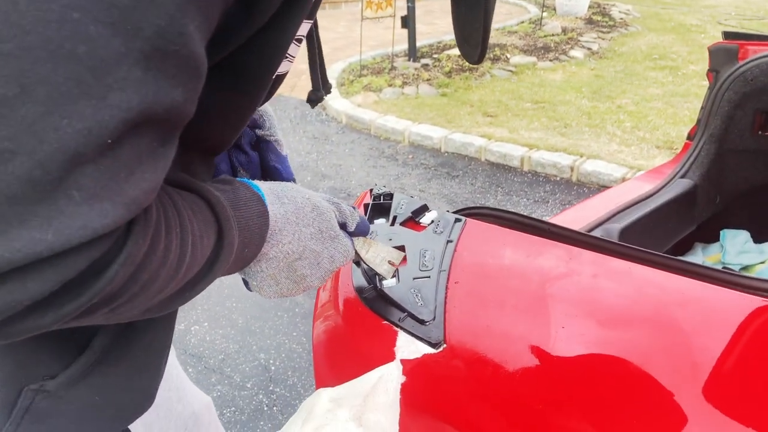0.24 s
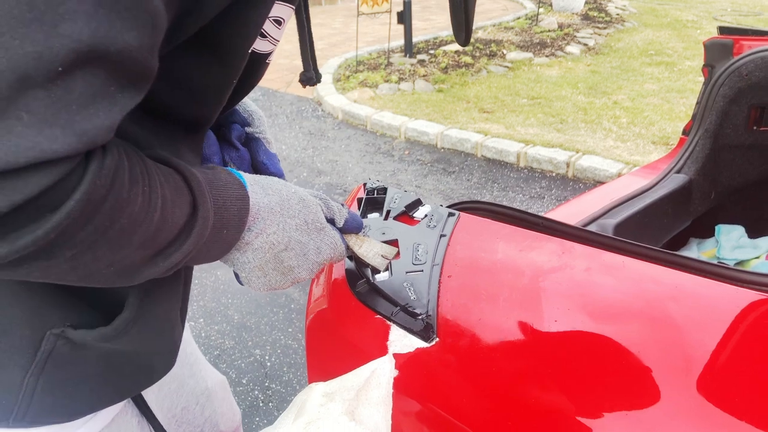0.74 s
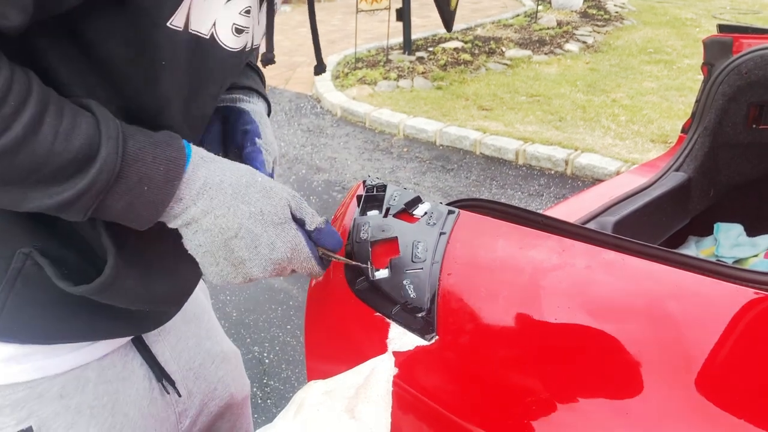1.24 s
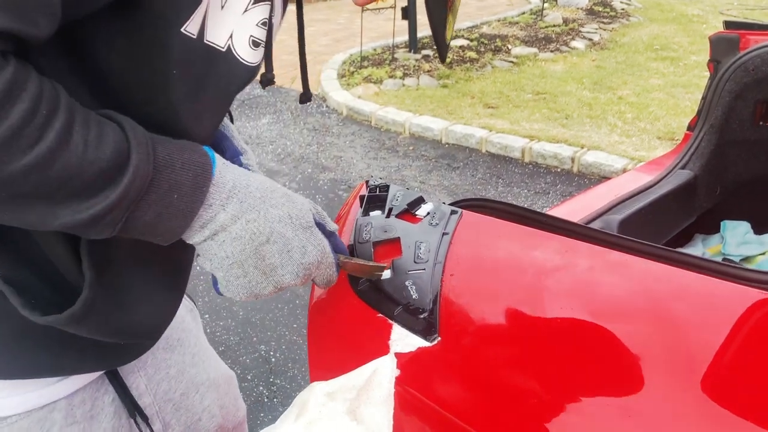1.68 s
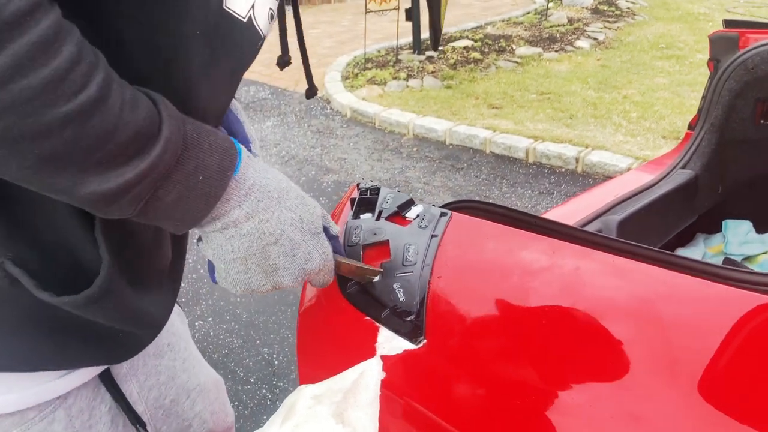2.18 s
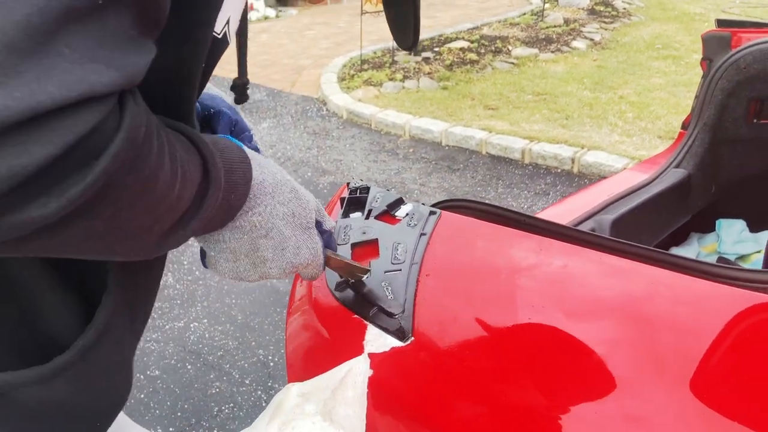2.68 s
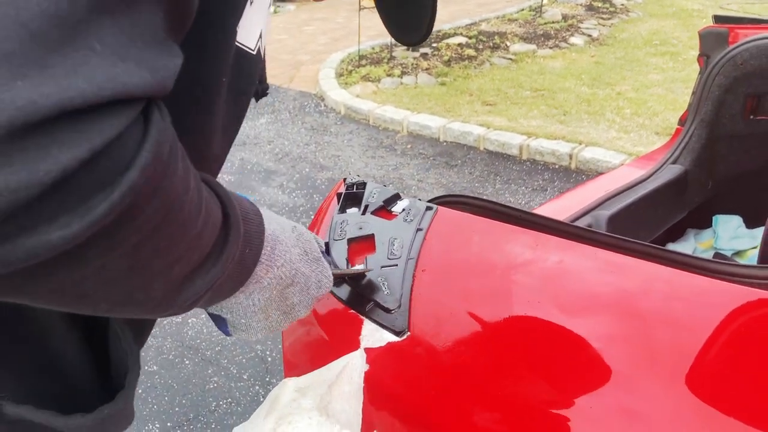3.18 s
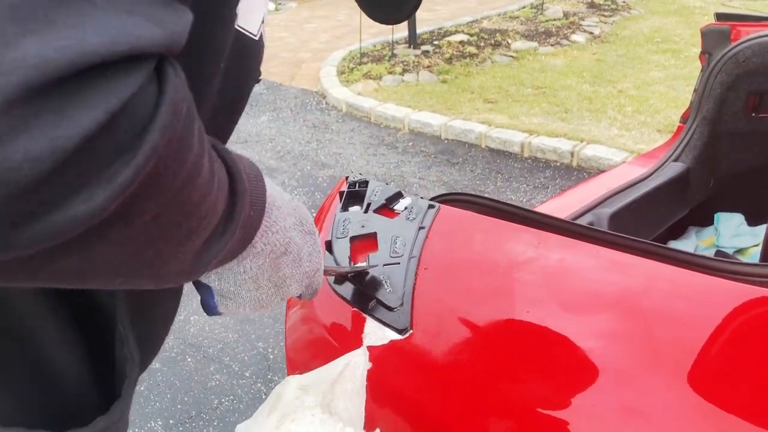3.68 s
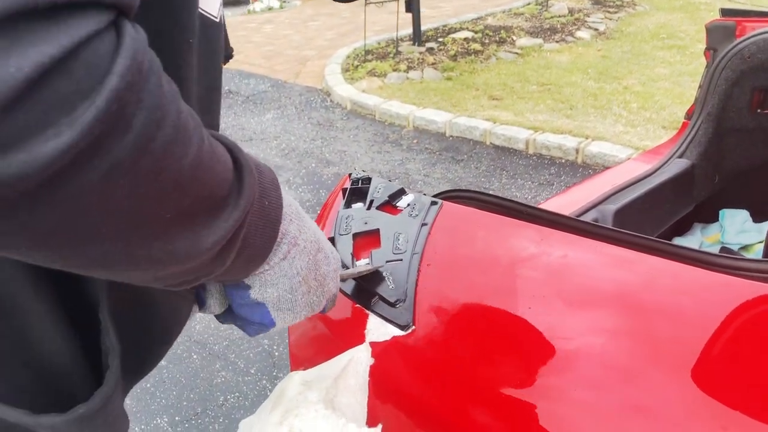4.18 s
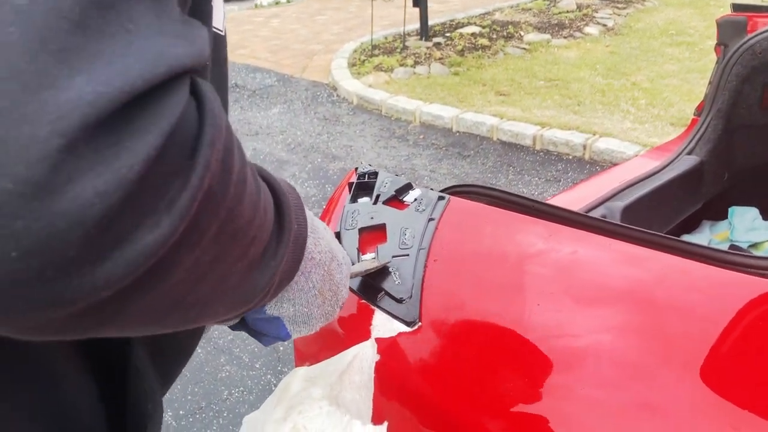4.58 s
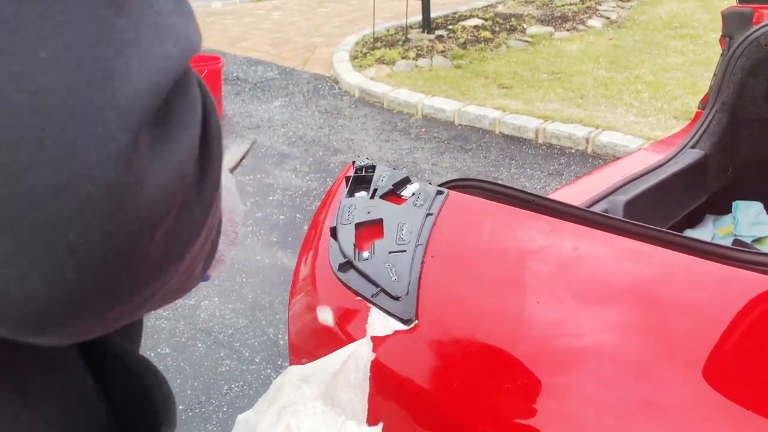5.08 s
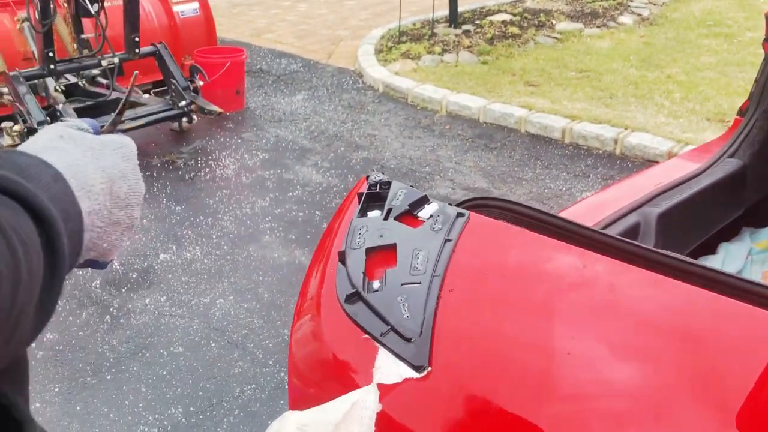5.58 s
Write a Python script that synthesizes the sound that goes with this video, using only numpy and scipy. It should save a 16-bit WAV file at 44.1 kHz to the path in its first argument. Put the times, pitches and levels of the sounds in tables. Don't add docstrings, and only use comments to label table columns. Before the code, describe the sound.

Plastic ticks, gritty rubs, hollow booms and a final sharp clip break outdoors, over small birdsong and distant road hum.

```python
import sys
import numpy as np
from scipy import signal
from scipy.fft import rfft, irfft, next_fast_len
from scipy.io import wavfile
from scipy.ndimage import uniform_filter1d, map_coordinates

SR = 44100
rng = np.random.default_rng(int(sys.argv[2]) if len(sys.argv) > 2 else 0)


def invert_db(x):
    u = np.asarray(x, float) / 20
    return 10 ** u


def pcm_store(signal):
    levels = np.round(np.clip(np.atleast_2d(signal), -1, 1) * 32767)
    wavfile.write(sys.argv[1], SR, levels.astype(np.int16).T)


N = 257676

# pitch_hz, level_db per Hz
ROAD_HUM = [(160, -34.5), (280, -4), (316, -2), (429, -2.5), (1020, -2), (1590, -11.5), (2850, -33.5),
            (4070, -33), (6570, -42.5), (15200, -49.5), (16500, -60)]
ROAD_RUMBLE = [(15, -60.5), (25, -21), (43, -12.5), (57, -7.5), (70, 0.5), (183, -3.5), (260, -9.5),
               (340, -39), (570, -120)]
HUM_DB, RUMBLE_DB = -55, -52.5
# peak_s, spread_s, level_db
PASSING_CAR = (4.6, .16, 2.5)
HUM_DUCK, RUMBLE_DUCK = (9.5, 4.5), (14.8, 17)  # depth_db, recovery_db_per_s
DUCK_FALL_S, DUCK_HOLD_S = 0.09, 0.17

# time_s, pitch_hz
HOOK = [(0, 4000), (.01, 4150), (.021, 5700), (.029, 5800), (.042, 5400), (.053, 5900), (.063, 4200)]
ARCH = [(0, 3800), (.012, 4700), (.022, 4900), (.034, 4400), (.05, 3500)]
RISE = [(0, 5800), (.005, 6800), (.012, 7300), (.028, 8000)]
SLUR = [(0, 3100), (.035, 3500), (.06, 4200), (.075, 4370), (.09, 4200), (.117, 3550)]
CLIMB = [(0, 3000), (.042, 3380), (.074, 4200)]
SCOOP = [(0, 3900), (.018, 4150), (.032, 5400)]
DIVE = [(0, 5300), (.012, 3650)]
CREST = [(0, 6100), (.012, 7300), (.022, 7700), (.04, 7100)]
FALL = [(0, 4400), (.025, 3510), (.05, 3150)]
FLAT = [(0, 4030), (.02, 4020), (.04, 3850)]
NOTES = {"hook": (HOOK, 55), "arch": (ARCH, 55), "rise": (RISE, 25), "slur": (SLUR, 12),
         "climb": (CLIMB, 15), "fall": (FALL, 40), "flat": (FLAT, 130),
         "scoop": (SCOOP, 30), "dive": (DIVE, 30), "crest": (CREST, 80)}
# note, delay_s, stretch, pitch factor, level_db
PHRASE = [("flat", -.014, .5, 1.02, -3), ("hook", 0, 1.01, 1.01, .1), ("flat", .073, .8, .97, -2),
          ("arch", .105, .9, 1.01, -3)]
# start_s, pitch factor, level_db
PHRASE_STARTS = [(.195, .99, -67), (.75, .99, -63), (1.72, .99, -65), (3.02, 1.01, -64), (3.665, 1.02, -59)]
CALLS_UP = {"rise": [(.972, .55, 1.01, -76), (1.168, 1.01, 1.01, -65), (2.086, .6, .98, -69),
            (3.752, .5, 1.01, -67), (3.178, .9, .76, -65), (3.751, .45, .74, -63), (5.004, .7, .76, -69),
            (5.112, .6, .61, -66)], "slur": [(1.035, 1.45, .92, -67), (1.05, 1.3, .97, -70),
            (2.994, 1.01, 1.01, -55), (5.73, 1.6, .82, -73), (3.962, .5, .74, -63)],
            "climb": [(3.058, 1.01, 1.01, -57), (2.69, .7, .93, -68), (3.215, .6, 1.02, -70),
            (3.83, .33, 1.06, -62)], "scoop": [(4.996, 1.05, 1.01, -65), (5.074, .78, .97, -65)],
            "crest": [(3.21, 1.01, .99, -71)]}
CALLS_DOWN = {"fall": [(3.435, 1.01, 1.01, -72), (5.38, 1.3, .85, -77), (3.152, 1.1, .99, -63)],
              "dive": [(5.058, .9, .97, -66), (5.132, .95, 1.01, -65), (3.788, 1.3, 1.05, -66)],
              "flat": [(.001, 2.2, .97, -71), (.39, 1.3, 1.05, -74), (3.92, .6, 1.08, -65),
              (4.7, 2.2, .93, -70), (.812, .9, 1.33, -65), (.9, 3.1, .99, -73), (3.71, 1.3, 1.4, -67),
              (3.69, 1.2, .76, -66), (2.23, 4.5, 1.2, -75), (2.44, 4.5, 1.22, -75),
              (1.208, 1.01, 3.42, -74), (2.13, .9, 3.5, -77), (3.28, 2.1, .95, -67),
              (3.262, 1.5, 1.07, -70), (3.805, .5, .93, -62), (3.65, .6, 1.01, -62), (2.735, 1.9, .91, -67),
              (5.04, .9, 1.43, -69), (3.2, .9, 1.33, -70), (3.255, 1.4, 1.83, -77)]}
# t60_s, level_db, delay_s
HOUSE_ECHO = (.32, -4.5, .008)
FLUTTER_DB, BIRDS_DB = 2.2, -4

# hardest_s, rise_s, fall_s, hiss level_db, body level_db over the hiss
STROKES = [(.497, .032, 0.017, -70.5, 8), (1.18, 0.19, .12, -74.5, 0.5), (1.352, 0.028, .045, -75.5, 10),
           (2.25, 0.06, 0.04, -77, 2.5), (2.32, .05, .04, -83, 2.5), (3.85, .05, .06, -82, 2.5),
           (2.381, 0.013, 0.047, -61, 1.5), (2.516, 0.12, 0.037, -68, 3), (2.621, 0.056, 0.076, -73.5, 4),
           (2.722, 0.067, 0.02, -72, 6.5), (2.913, 0.025, 0.11, -76, 4), (3.149, .055, 0.048, -74.5, -6),
           (3.61, 0.062, 0.062, -75.5, 7), (3.74, 0.073, 0.062, -73.5, 10.5),
           (3.94, 0.032, 0.061, -68.5, 5), (4.149, 0.012, 0.009, -61, -3),
           (4.284, 0.049, 0.063, -67.5, 3.5), (4.424, 0.036, 0.25, -72.5, 6.5),
           (4.594, 0.038, 0.093, -67, -4.5), (4.71, 0.15, .025, -68.5, 6.5),
           (5.038, 0.045, 0.086, -74.5, 4), (5.173, 0.002, 0.022, -74, 15),
           (5.213, 0.0091, 0.055, -67, 5.5), (5.258, 0.019, 0.047, -66.5, 3), (5.548, 0.05, 0.0095, -64, 2),
           (5.742, 0.013, 0.03, -56.5, -2.5)]
# pitch_hz, level_db per Hz
GRIT = [(2940, -35), (5000, -1), (8880, -4.5), (11700, -8.5), (15200, -4), (16100, -1.5), (16500, -40.5)]
PLASTIC = [(500, -39.5), (1000, 2.5), (2200, 2.5), (3200, 0), (5000, -5), (8000, -18.5), (12000, -54)]
EASE_DB = 10.5
# hiss level_db, body level_db over the hiss, fall_db_per_s
CRUMBLE = (-47.5, 8.3, 270)

# start_s, level_db
SPECKS = [(1.0374, -65), (1.0574, -57), (1.1308, -58), (1.1444, -60), (2.2508, -58), (2.4844, -52),
          (2.5004, -50), (2.5124, -52), (2.603, -58), (2.6374, -48), (2.6993, -48), (3.0194, -60),
          (3.0954, -63), (3.1108, -52), (3.5194, -60), (3.5484, -63), (3.6097, -49), (3.6334, -62),
          (3.7094, -53), (3.7214, -53), (3.8074, -65), (3.919, -57), (3.929, -53), (4.3954, -53),
          (4.4474, -59), (4.4638, -55), (4.5131, -54), (4.57, -42), (4.6474, -52), (4.6714, -52),
          (4.7656, -65), (5.029, -55), (5.2445, -47)]
# start_s, body level_db, edge level_db
TAPS = [(0.1397, -58, -69), (0.2034, -54, -74), (0.7234, -70, -78), (0.752, -67, -73), (0.8075, -53, -84),
        (0.8734, -50, -81), (1.0754, -60, -74), (1.3784, -61, -71), (1.7384, -63, -86), (1.8375, -66, -86),
        (2.0961, -48, -82), (2.2024, -52, -63), (2.644, -59, -59.5), (2.6903, -57, -67), (2.7184, -56, -61),
        (2.828, -54, -66), (2.8886, -52, -67), (3.147, -50, -70), (3.175, -58, -77), (3.5314, -63, -72),
        (3.7612, -50, -68), (3.9672, -52, -62), (4.2837, -47, -64), (4.6177, -45, -52), (4.9405, -51, -71),
        (5.5009, -56, -62)]
BRACKET_HZ = 1670
# start_s, body level_db, edge level_db, body
# pitch_hz
MORE_TICKS = [(.4574, -50, -74, 2400), (0.4717, -52, -72, 2400), (.4913, -49, -54, 3000),
              (.507, -53, -59, 2500), (.7295, -76, -73, 3140), (1.014, -55, -86, 1290),
              (4.43, -49, -68, 2500), (4.7925, -38.5, -43.5, 4600), (4.803, -42, -52, 3100),
              (4.8178, -20, -29, 1487), (5.409, -60, -69.5, 3940)]
FIRM_TICKS = [(0.2934, -47.5, -61, 1750), (0.3139, -40.5, -67, 1630), (0.561, -36, -76, 1710),
              (2.213, -46.5, -61, 1700), (2.367, -46, -67, 2120), (2.38, -40, -59, 2240),
              (2.3983, -43, -60, 1810), (2.9076, -43, -53, 1960), (2.9793, -30.5, -48.5, 1790),
              (3.565, -48.5, -75, 1820), (3.6097, -44, -57, 4570), (3.6946, -41.5, -57.5, 3050),
              (3.7674, -44, -70, 3670), (3.8538, -36, -52, 5060), (3.8993, -33.5, -73, 1600),
              (3.946, -45, -62, 2540), (4.131, -43, -60, 2000), (4.1477, -44.5, -63, 1650),
              (4.2315, -48, -71, 1600), (4.295, -44, -64, 1900), (4.4184, -45.5, -62, 2160),
              (4.4947, -45.5, -63, 2760), (4.5884, -57, -55, 2710), (4.7014, -50.5, -56, 3600),
              (4.8356, -23, -51, 1870), (5.1697, -41.5, -61, 2710), (5.2116, -43, -65, 2230),
              (5.2575, -41.5, -53, 3100), (5.7322, -52, -49.5, 2716), (5.7614, -45.5, -53, 4960)]

# start_s, boom pitch_hz, boom level_db, body
# level_db, body t60_s
BOOMS = [(.312, 203, -39, -41, .06), (.515, 232, -55, -37, 0.24), (0.5593, 196.6, -25.5, -31, 0.1),
         (0.599, 188, -40.5, -49, 0.097), (1.667, 400, -37, -31, 0.2), (1.687, 390, -39, -42, .1),
         (1.712, 350, -42, -46, .1), (1.733, 370, -42, -48, .1), (1.971, 200, -34.5, -36, 0.11),
         (2.375, 195, -67, -39, 0.053), (2.9748, 182, -16, -27.5, 0.09), (2.9995, 310, -32, -45, .06),
         (3.008, 189, -28.5, -38, 0.19), (3.045, 182, -39, -58, 0.09), (3.897, 177, -42, -39.5, 0.054),
         (4.262, 302, -58, -36.5, 0.033), (4.802, 425, -32, -36.5, .05), (4.815, 215, -32, -29, 0.12),
         (4.83, 135, -29.5, -24.5, 0.18), (4.923, 161, -48.5, -50, 0.042), (5.2115, 2250, -39, -70, .05),
         (5.209, 199, -69, -43, 0.089)]
# pitch_hz, width_hz, level_db
COVER = [(292, 44, 3), (377, 52, 2.5), (466, 84, 0), (649, 73, -3), (832, 97, -6), (1140, 170, -8.5),
         (1600, 330, -13.5)]
SWELL_CYCLES = 2.53
# peak_s, pitch_hz, level_db, rise_s, fall_s
FLAP = [
    (4.846, 72, -21.5, .018, .014),
    (4.84, 33, -36, .02, .02),
]
# length_s, pitch_hz, level_db
STRAIN = (.02, 3060, -41)
# start_s, start pitch_hz, end pitch_hz, sweep_s, t60_s, level_db
WHIP = (4.8148, 1500, 230, .0035, .03, -19.5)
# start_s, peak level_db, blow t60_s, rattle t60_s, rattle level_db
SNAPS = [
    (0.5145, -13, 0.015, .13, -11.5),
    (1.6632, -27.5, 0.03, 0.11, -11),
    (1.9705, -24, 0.014, 0.095, -13),
    (2.9705, -26, 0.024, .06, -20),
    (4.815, -8.5, 0.0097, 0.21, -9),
]
# pitch_hz, width_hz, level_db
FIRST_CLIP = [(1400, 110, 5.5), (2000, 370, 0), (3160, 520, -3), (5560, 130, -3), (6050, 110, -2),
              (7400, 140, -4.5), (10000, 260, -40), (15160, 380, -17)]
BLADE = [(1150, 70, 9), (1660, 400, 0), (2790, 60, 5), (3170, 200, -2), (3750, 200, -5), (4790, 110, -3),
         (6000, 600, -14), (7460, 110, -6), (11300, 300, -19), (15000, 300, -22)]
BRACKET = [(1170, 260, -2.5), (2160, 630, 7.5), (3100, 730, 6), (4840, 420, 3.5), (6400, 250, -10),
           (11500, 9000, -15)]
LIP = [(810, 120, 7.5), (1710, 340, -1), (2400, 130, -13), (4740, 160, -3), (7400, 440, -11.5),
       (8560, 360, -24)]
LAST_CLIP = [(775, 310, 3.5), (1945, 700, -0.5), (2990, 600, -4), (5800, 1300, -0.5), (8240, 900, 0),
             (12900, 2500, -2.5), (15510, 700, 8)]
STRUCK = (FIRST_CLIP, BLADE, BRACKET, LIP, LAST_CLIP)
LAST_SNAP_S = SNAPS[-1][0]

# (pitch_hz, level_db per Hz)
SELF_HISS = (-80, [(1500, -43), (2600, -1), (5000, -2), (7000, -10), (15500, -15.5)])
# pitch_hz, level_db
MIC_TOP = [(15700, -0.5), (16300, -25.5), (17000, -41.5)]


def unit(x):
    return x / np.sqrt(np.mean(x ** 2) + 1e-20)


def along(points, hz):
    f, v = np.transpose(points)
    return np.interp(np.log(hz + 1), np.log(f + 1), v)


def filtered(x, response):
    m = next_fast_len(len(x) + SR // 10)
    return irfft(rfft(x, m) * response(np.fft.rfftfreq(m, 1 / SR)), m)[:len(x)]


def coloured(x, spectrum):
    return unit(filtered(x, lambda hz: invert_db(along(spectrum, hz))))


def resonances(modes):
    def response(f):
        total = 0
        for k, (centre, width, db) in enumerate(modes):
            total = total + (-1) ** k * invert_db(db) * 1j * f * width / (centre * centre - f * f + 1j * f * width)
        return total
    return response


def wobble(rate):
    knots = rng.standard_normal(N // 64)
    return map_coordinates(knots, [np.arange(N) * rate / SR])


def fading(t60, size=4096):
    return rng.standard_normal(size) * invert_db(-60 * np.arange(size) / SR / max(t60, .002))


def patchy(x, depth_db, size):
    z = signal.stft(x, nperseg=512)[2]
    field = uniform_filter1d(rng.standard_normal(z.shape), size=size[0], axis=0)
    field = uniform_filter1d(field, size=size[1], axis=1)
    return signal.istft(z * invert_db(depth_db * unit(field)), nperseg=512)[1][:N]


def trailing(level, release):
    keep = np.exp(-1 / (release * SR))
    tail = 0.37 * signal.lfilter([1 - keep], [1, -keep], level)
    return np.maximum(uniform_filter1d(level, size=180), tail)


def add(x, s, sound):
    part = x[max(round(s * SR), 0):][:len(sound)]
    part += sound[:len(part)]


def ducked_db(depth_db, recovery):
    t = np.arange(N) / SR - LAST_SNAP_S
    climb = recovery * np.maximum(t - DUCK_FALL_S - DUCK_HOLD_S, 0)
    return -np.maximum(depth_db * np.clip(t / DUCK_FALL_S, 0, 1) - climb, 0)


def traffic():
    peak_s, spread_s, swell = PASSING_CAR
    car_db = swell * np.exp(-.5 * ((np.arange(N) / SR - peak_s) / spread_s) ** 2)
    hum_db = HUM_DB + car_db + ducked_db(*HUM_DUCK) + .8 * wobble(8.6)
    tyres = patchy(rng.standard_normal(N), depth_db=0.96, size=(9, 8))
    hum = invert_db(hum_db) * coloured(tyres, ROAD_HUM)
    lumps_db = 0.78 * wobble(3.8) + 0.77 * wobble(11)
    rumble_db = RUMBLE_DB + ducked_db(*RUMBLE_DUCK) + lumps_db
    return hum + invert_db(rumble_db) * coloured(rng.standard_normal(N), ROAD_RUMBLE)


def birds():
    out, shimmer = np.zeros(N), wobble(350)
    notes = []
    for s, pitch, db in PHRASE_STARTS:
        for name, delay, stretch, factor, rel_db in PHRASE:
            notes.append((name, s + delay, stretch, pitch * factor, db + rel_db))
    for calls in (CALLS_UP, CALLS_DOWN):
        for name in calls:
            notes += [(name, *call) for call in calls[name]]
    for name, s, stretch, pitch, db in notes:
        shape, blur_hz = NOTES[name]
        at, hz = np.transpose(shape)
        t = np.arange(round(at[-1] * stretch * SR)) / SR
        glide = uniform_filter1d(np.interp(t, at * stretch, hz * pitch), size=150)
        glide += blur_hz * np.roll(shimmer, -round(s * SR))[:len(t)]
        whistle = np.sin(2 * np.pi * np.cumsum(glide) / SR)
        add(out, s, invert_db(db) * signal.windows.tukey(len(t), .16) * whistle)
    t60, echo_db, delay = HOUSE_ECHO
    tail = fading(t60, size=SR // 2)
    late_tail = np.pad(tail, (round(delay * SR), 0)) / np.linalg.norm(tail)
    echo = signal.fftconvolve(out, late_tail)[:N]
    return invert_db(BIRDS_DB) * (out * invert_db(FLUTTER_DB * wobble(120)) + invert_db(echo_db) * echo)


def rubbing():
    t = np.arange(N) / SR
    strokes = []
    for s, rise, fall, db, rel_db in STROKES:
        away = abs(t - s) / np.where(t < s, rise, fall)
        strokes.append((np.clip(3.5 - 2.8 * away, 0, 1), db - EASE_DB * away, rel_db))
    db, rel_db, fall = CRUMBLE
    strokes.append((t > LAST_SNAP_S, db - fall * abs(t - LAST_SNAP_S), rel_db))

    hiss, body = np.full(N, invert_db(-91.5)), np.zeros(N)
    for inside, level_db, rel_db in strokes:
        level = inside * invert_db(level_db)
        hiss = hiss + invert_db(4.0) * level
        body = body + invert_db(rel_db + 4.5) * level

    catches = (rng.random(N) < 130 / SR) * rng.exponential(1.9, N)
    crackle = signal.fftconvolve(catches, invert_db(-60 * t[:SR // 100] / 0.0032))[:N]
    slips = unit(invert_db(1.3 * wobble(300) + 2.6 * wobble(45)) * (1 + crackle))
    rough_hiss = patchy(slips * rng.standard_normal(N), depth_db=2.2, size=(40, 2))
    rough_body = patchy(slips * rng.standard_normal(N), depth_db=2.2, size=(40, 2))
    hiss_sound = trailing(hiss, 0.0082) * coloured(rough_hiss, GRIT)
    return hiss_sound + trailing(body, .012) * coloured(rough_body, PLASTIC)


def ticks(contacts):
    out, impact = np.zeros(N), 2.3 * (np.arange(4096) < 2)
    for s, body_db, edge_db, hz in contacts:
        knock = filtered(impact + fading(0.024), lambda f: resonances([(hz, 2000, 0)])(f) ** 2)
        edge = filtered(impact + fading(0.0097), lambda f: (1j * f / (3500 + 1j * f)) ** 2)
        knock = invert_db(body_db - 1.5) * knock / abs(knock).max()
        add(out, s, knock + invert_db(edge_db + 12.5) * edge / abs(edge).max())
    return out


def specks():
    return ticks([(s, db - 16, db - 12, 4000) for s, db in SPECKS])


def tool_contacts():
    taps = [(*tap, BRACKET_HZ) for tap in TAPS]
    return ticks(list(FIRM_TICKS) + list(MORE_TICKS) + taps)


def panel():
    out, t = np.zeros(N), np.arange(SR // 4) / SR
    for s, hz, boom_db, body_db, t60 in BOOMS:
        swell = SWELL_CYCLES / hz
        boom = (t / swell * np.exp(1 - t / swell)) ** 3 * np.sin(2 * np.pi * hz * t)
        shove = fading(t60, size=len(t)) * (1 - np.exp(-t / 0.00095))
        body = filtered(shove, lambda f: resonances(COVER)(f) / (1 + 1j * f / 2600) ** 2)
        add(out, s, invert_db(boom_db) * boom + invert_db(body_db) * body / abs(body).max())
    return out


def flap():
    out = np.zeros(N)
    for s, hz, db, rise, fall in FLAP:
        t = np.arange(N) / SR - s
        swing = np.exp(-.5 * (t / np.where(t < 0, rise, fall)) ** 2)
        out += invert_db(db) * swing * np.cos(2 * np.pi * hz * t)
    return out


def strain():
    out, (length, hz, db) = np.zeros(N), STRAIN
    t = np.arange(round(length * SR)) / SR
    add(out, LAST_SNAP_S - length, invert_db(db) * t / length * np.sin(2 * np.pi * hz * t))
    return out


def whip():
    out, (s, top_hz, end_hz, sweep, t60, db) = np.zeros(N), WHIP
    t = np.arange(SR // 20) / SR
    hz = end_hz + (top_hz - end_hz) * np.exp(-t / sweep)
    add(out, s, invert_db(db - 60 * t / t60) * np.sin(2 * np.pi * np.cumsum(hz) / SR))
    return out


def snaps():
    def bare_crack(f):
        return invert_db(-11) * 1j * f / (600 + 1j * f) / (1 + 1j * f / 4500)

    out = np.zeros(N)
    for (s, db, t60, rattle_t60, rattle_db), modes in zip(SNAPS, STRUCK):
        blow = fading(t60)
        rattle = filtered(fading(rattle_t60), lambda f: 1 / (1 + 1j * f / 2200) ** 2)
        force = blow + invert_db(rattle_db) * rattle
        crack = filtered(force, lambda f: resonances(modes)(f) + bare_crack(f))
        add(out, s, invert_db(db) * crack / abs(crack).max())
    return out


def scene():
    background = traffic() + birds()
    handling = rubbing() + specks() + tool_contacts()
    release = panel() + flap() + strain() + whip() + snaps()
    return (background + handling + release)[None]


def low_pass(x):
    return signal.sosfilt(signal.butter(12, 17080, fs=SR, output="sos"), x)


def record(dry):
    hiss_db, hiss_spectrum = SELF_HISS
    heard = dry[0] + invert_db(hiss_db) * coloured(rng.standard_normal(N), hiss_spectrum)
    mix = filtered(heard, lambda hz: invert_db(along(MIC_TOP, hz)))[None]
    return low_pass(mix)


dry = scene()
out = record(dry)
pcm_store(out)
```